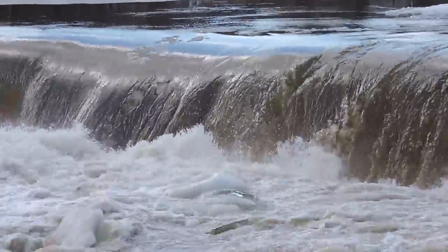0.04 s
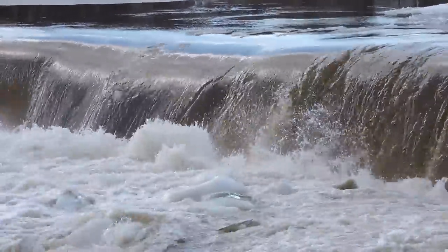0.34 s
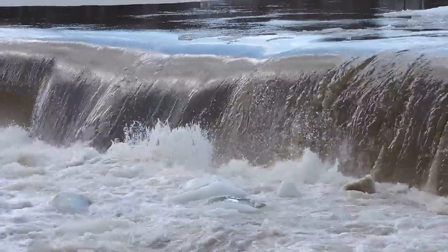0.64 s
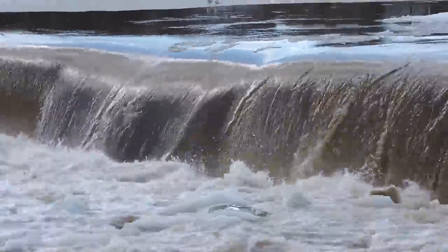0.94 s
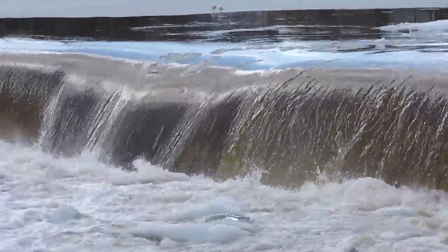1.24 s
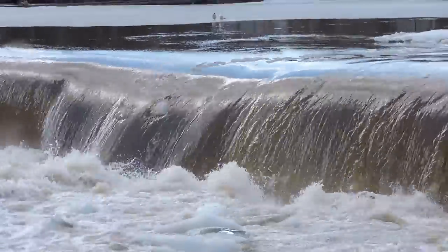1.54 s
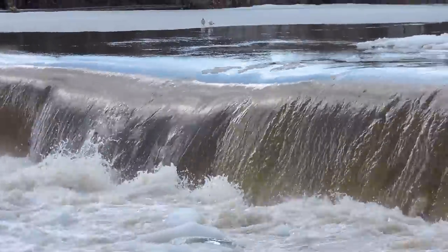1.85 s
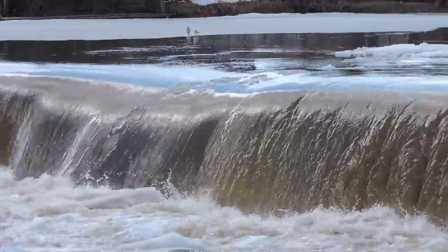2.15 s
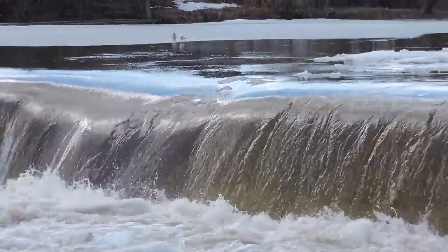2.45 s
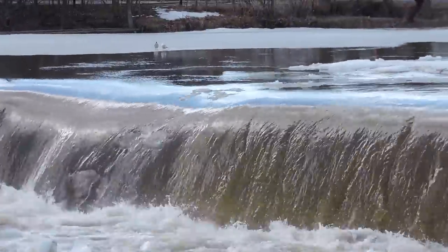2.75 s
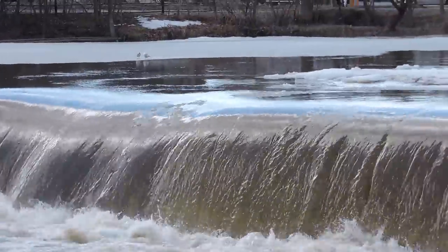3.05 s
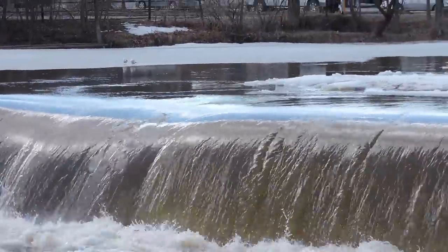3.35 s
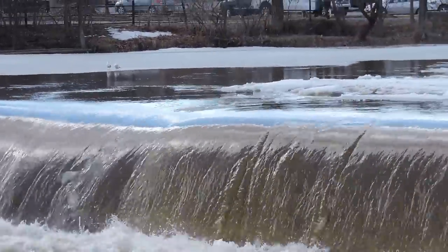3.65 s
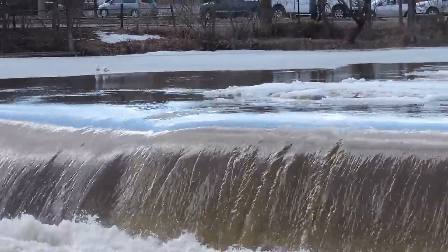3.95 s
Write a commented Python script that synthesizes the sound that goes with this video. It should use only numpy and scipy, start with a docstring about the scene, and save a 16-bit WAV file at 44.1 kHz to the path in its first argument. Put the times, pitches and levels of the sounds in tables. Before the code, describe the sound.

A river roars over a low weir while wind buffets the microphone.

```python
"""A broad roar of water: a swollen river pours over a low weir, wide and a little to the left.
Air churned under by the fall rings as short rising bubbles, and spray adds a thin hiss on top.
Wind rumbles on each of the two microphone ports separately and hits them in short buffets;
the hardest lands as a dull thump."""
import sys
import numpy as np
from scipy import signal
from scipy.fft import rfft, irfft, next_fast_len
from scipy.io import wavfile
from scipy.ndimage import uniform_filter1d, map_coordinates

SR = 44100
rng = np.random.default_rng(int(sys.argv[2]) if len(sys.argv) > 2 else 0)


def put_to_file(sound):
    """Save the sound as 16-bit audio at rate SR, in the file named by the first command-line argument."""
    columns = np.atleast_2d(sound).T  # one column per channel
    safe = np.clip(columns, -1, 1)
    whole_steps = np.round(safe * 32767)
    wavfile.write(sys.argv[1], SR, whole_steps.astype(np.int16))


N = 176400


# Fader ride on the water: dips after two hard buffets, then builds (time [s], level before trim [dB])
WATER_RIDE = [(0, -47), (.45, -46.7), (.5, -49), (.76, -48.8), (.8, -51.5), (1.27, -51), (1.5, -46.5),
              (1.95, -46.5), (2.04, -44), (2.15, -45.3), (2.4, -45), (2.55, -41.5), (2.67, -42),
              (2.87, -43), (3.12, -42), (3.48, -41.5), (3.66, -43), (3.83, -45), (4, -45.5)]
# Tone of falling water, full lows to thin spray (frequency [Hz], relative spectral level [dB])
WATER_TONE = [(20, 0), (60, 0), (120, 2.5), (300, -0.5), (480, -4.5), (580, -8.5), (800, -9.5), (1500, -14),
              (2600, -19.5), (4000, -29), (6500, -32.5), (10000, -37.5), (13200, -36.5), (15500, -42.5)]

def weir(trim_db=18, bubble_db=-19.5, churn_db=0.14, churn_per_s=13):
    """The roar of the falling sheet and its bubbles swell and sink together."""
    level_db, = curves(WATER_RIDE)
    roar = unit(filtered(patchy_noise(depth_db=0.83), lambda hz: amp(along(WATER_TONE, hz))))
    froth = amp(bubble_db) * np.array([bubbles(), bubbles()])
    water = weir_width(roar + froth)
    surge_db = churn_db * wobble(churn_per_s)  # slight, quick surges of the plunge
    return water * amp(level_db + trim_db + surge_db)


def patchy_noise(depth_db, size=512):
    """Grain for the roar: two unrelated noises, gain shifting in shared patches of time and pitch."""
    spectra = signal.stft(rng.standard_normal((2, N)), nperseg=size)[2]
    patches = uniform_filter1d(rng.standard_normal(spectra.shape[1:]), size=6, axis=0)
    patches = uniform_filter1d(patches, size=10, axis=1)
    return signal.istft(spectra * amp(depth_db * unit(patches)), nperseg=size)[1][:, :N]


def bubbles(count=2400, median_hz=875, log_spread=0.524, ring_cycles=12, rise=0.21):
    """Air churned under by the fall: short rings that rise in pitch."""
    onset = (rng.random(count) * N).astype(int)
    strength = np.minimum(rng.exponential(size=count), 4)[:, None]
    hz = median_hz * np.exp(log_spread * rng.standard_normal((count, 1)))
    samples = np.arange(1200)
    cycles = hz * samples / SR
    age = np.minimum(cycles / ring_cycles, 2)
    envelope = (1 - np.exp(-cycles)) * amp(-60 * age)
    tone = np.sin(2 * np.pi * cycles * (1 + rise * age))
    rings = strength * np.sqrt(median_hz / hz) * envelope * tone  # low bubbles ring louder
    where = onset[:, None] + samples
    return unit(np.bincount(where.ravel(), rings.ravel(), N)[:N])


# Stereo image: near-mono lows, wide highs (frequency [Hz], left-right likeness [0-1])
PORT_LIKENESS = [(100, 0.95), (450, 0.99), (900, 0.82), (1550, 0.64), (2300, 0.3), (3200, 0.32),
                 (5000, 0.11), (7000, 0.33), (9000, 0), (15000, 0.25)]
# Phase pull to the left (frequency [Hz], lead of the left port [rad])
LEFT_LEAD = [(100, 0), (700, 0.17), (1600, 0.31), (3500, 2.5), (4700, 3.1), (5600, 6), (8000, 6.5),
             (10500, 2.5), (14000, 6.5)]
# Pan across the spectrum (frequency [Hz], left minus right [dB])
LEFT_BALANCE = [(300, 0), (1200, 0.4), (2000, 0), (2900, .2), (3600, 2.5), (5000, 1.2), (9000, -.4),
                (12500, 0.5), (14300, 2)]

def weir_width(pair):
    """Spread two unrelated signals over the arc of the weir, as the two ports hear it."""
    def mid_side_gains(hz):
        angle = np.arccos(np.clip(along(PORT_LIKENESS, hz), 0, 1)) / 2
        return np.array([np.cos(angle), np.sin(angle)])

    def lean_left(hz):
        half = np.array([[.5], [-.5]])  # each port takes half, in opposite directions
        return amp(half * along(LEFT_BALANCE, hz)) * np.exp(1j * half * along(LEFT_LEAD, hz))

    mid, side = filtered(pair, mid_side_gains)
    return filtered(np.array([mid + side, mid - side]), lean_left)


# Wind hits, levels before trim
# (time [s], swell half-width [s], left level [dB], right level [dB], upper edge [Hz])
BUFFET_CUES = [(.021, 0.013, -13.5, -24, 220), (0.033, 0.014, -32, -17, 109),
               (0.077, 0.0093, -38, -14, 274), (0.207, 0.0027, -45, -22, 800),
               (0.476, .008, -14.5, -39, 320), (0.591, 0.0093, -20, -42, 300), (0.742, .018, -12, -30, 300),
               (0.763, 0.0088, -19, -15.5, 280), (0.776, .012, -19, -30, 620),
               (0.952, 0.015, -16, -45, 404), (1.018, 0.015, -21.5, -47, 340),
               (1.064, 0.01, -19.5, -38, 330), (1.103, .016, -20.5, -29, 400),
               (1.353, 0.013, -17.5, -45, 298), (1.479, .014, -16, -40, 363),
               (1.631, 0.0098, -12.5, -42, 125), (2.049, 0.0052, -35, -14, 120),
               (2.172, .014, -30, -19, 100), (2.437, 0.0078, -42, -19, 260), (2.536, .016, -35, -21.5, 80),
               (2.695, 0.0086, -29, -14.5, 220), (3.11, 0.025, -27, -20, 190), (3.463, 0.014, -15, -23, 75),
               (3.5, 0.027, -22, -24, 297), (3.658, 0.028, -23, -17, 62.5), (3.789, 0.0096, -32, -15, 91)]

def buffets(trim_db=-0.5, low_edge_ratio=0.26):
    """Single strong eddies swell and pass, mostly on one port."""
    out, t = np.zeros((2, N)), np.arange(N) / SR
    for time_s, half_width_s, left_db, right_db, edge_hz in BUFFET_CUES:
        swell = np.exp(-.5 * ((t - time_s) / half_width_s) ** 2)
        eddy = swell * turbulence(rng.standard_normal((2, N)), low_edge_ratio * edge_hz, edge_hz)
        makeup_gain = np.linalg.norm(swell) / np.linalg.norm(eddy, axis=1, keepdims=True)
        out += amp([[left_db], [right_db]]) * eddy * makeup_gain
    return amp(trim_db) * out


# Wind bed under the hits (time [s], left level [dB], right level [dB], upper edge [Hz])
WIND_BED = [(0, -34, -22, 190), (.18, -31, -24.5, 231), (.35, -28, -23, 305), (.52, -21, -26, 221),
            (.66, -29.5, -31, 283), (.87, -24, -22, 390), (1.08, -27, -30, 354), (1.23, -30.5, -35, 219),
            (1.38, -26, -33, 260), (1.6, -25, -35, 243), (1.88, -34.5, -39, 110), (2.12, -26, -20.5, 125),
            (2.38, -37, -26, 131), (2.66, -29, -21, 81), (2.95, -35, -26.5, 70.4), (3.45, -25, -26, 75.5),
            (3.75, -32, -21.5, 110), (4, -21, -26, 70)]

def wind(low_hz=15, flutter_db=1.5, flutter_per_s=35):
    """Fluttering rumble, unrelated from port to port; faster air reaches higher."""
    left_db, right_db, edge_hz = curves(WIND_BED)
    noise = rng.standard_normal((2, N))
    band_edges_hz = np.geomspace(55, 450, 5)
    rumble = np.zeros((2, N))
    for hz, solo in zip(band_edges_hz, np.eye(len(band_edges_hz))):
        crossfade = np.interp(np.log(edge_hz), np.log(band_edges_hz), solo)
        rumble += crossfade * turbulence(noise, low_hz, hz)
    flutter = amp(flutter_db * np.array([wobble(flutter_per_s), wobble(flutter_per_s)]))
    return amp([left_db, right_db]) * unit(rumble * flutter)


def turbulence(noise, low_hz, edge_hz, edge_order=4.03, skirt_db=-31):
    """Eddies on a port: a flat band with a steep upper edge and a faint skirt, rms 1."""
    def band(hz):
        ratio = hz / edge_hz
        body = 1 / np.sqrt(1 + ratio ** (2 * edge_order))
        skirt = amp(skirt_db) / (1 + (ratio / 3) ** 2)
        low_cut = hz ** 2 / np.sqrt(hz ** 4 + low_hz ** 4)
        return (body + skirt) * low_cut
    return unit(filtered(noise, band))


def amp(db):
    """Decibels to gain."""
    return 10 ** (np.asarray(db) / 20)


def unit(x):
    """Scale to rms 1."""
    return x / np.sqrt(np.mean(x ** 2) + 1e-20)


def along(points, hz):
    """Read (frequency [Hz], value) points on a log axis."""
    point_hz, values = np.transpose(points)
    return np.interp(np.log(hz + 1), np.log(point_hz + 1), values)


def curves(rows):
    """Automation lanes: one value per sample for each column after the time."""
    times, *columns = np.transpose(rows)
    return [np.interp(np.arange(N) / SR, times, column) for column in columns]


def wobble(rate):
    """A smooth random curve, rate knots a second."""
    return map_coordinates(rng.standard_normal(size=1024), [np.arange(N) * rate / SR], mode="wrap")


def filtered(x, response):
    """Filter x by a complex response of frequency."""
    size = next_fast_len(N + SR // 2)
    return irfft(rfft(x, size) * response(np.fft.rfftfreq(size, 1 / SR)), size)[..., :N]


def scene():
    """Water ahead, wind on the microphone."""
    return weir() + wind() + buffets()


def record(dry):
    """The camera keeps nothing above its band limit."""
    return filtered(dry, lambda hz: hz < 15760)


dry = scene()
out = record(dry)
put_to_file(out)
```